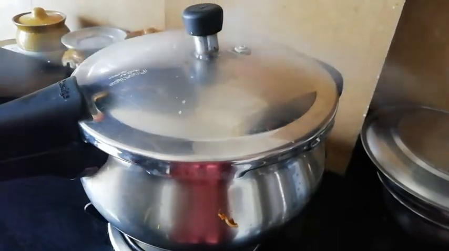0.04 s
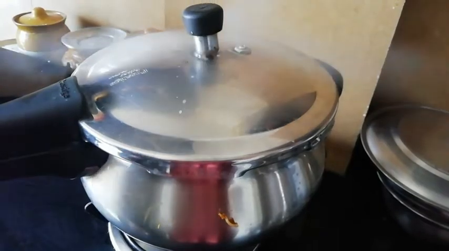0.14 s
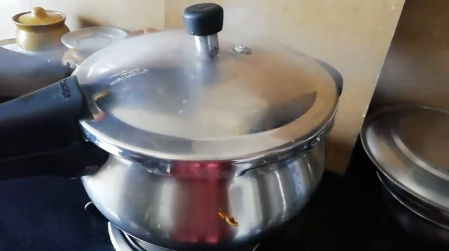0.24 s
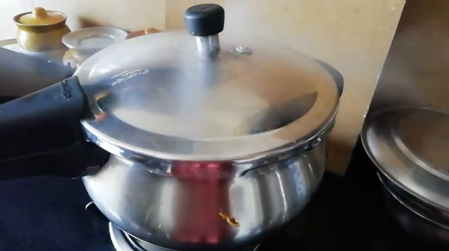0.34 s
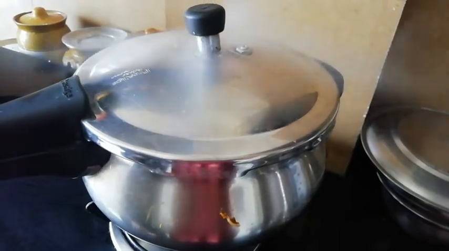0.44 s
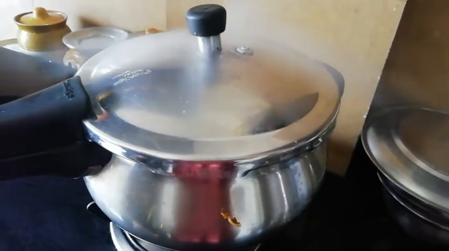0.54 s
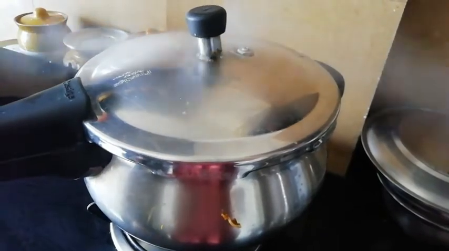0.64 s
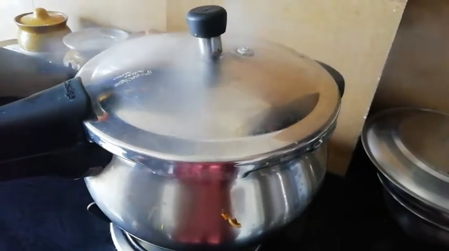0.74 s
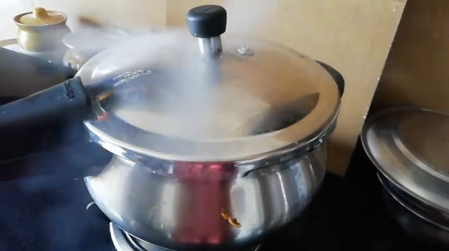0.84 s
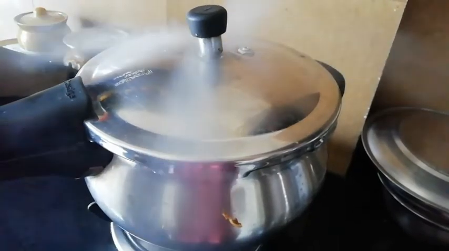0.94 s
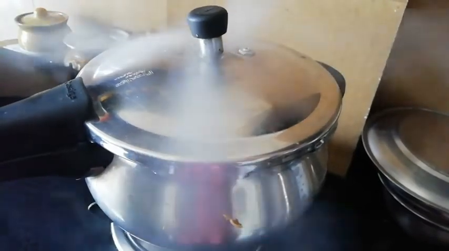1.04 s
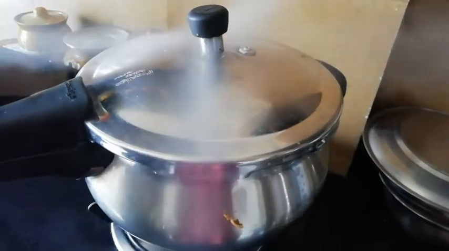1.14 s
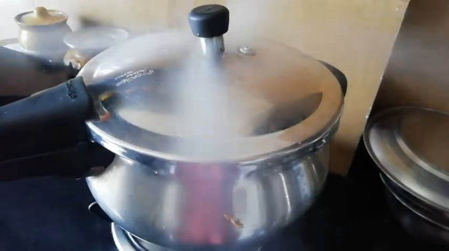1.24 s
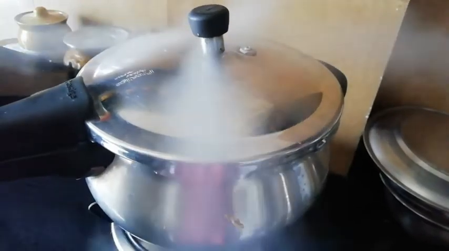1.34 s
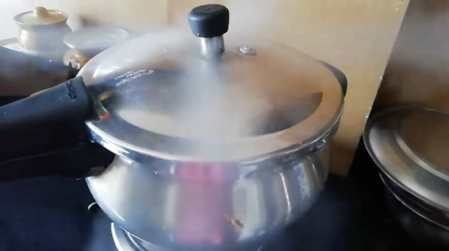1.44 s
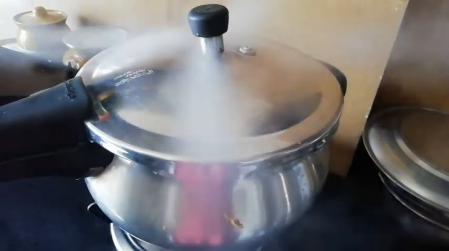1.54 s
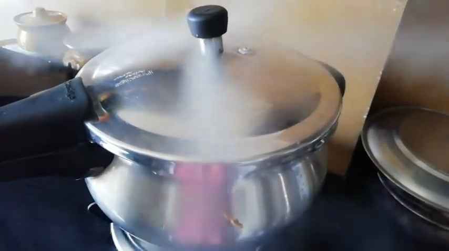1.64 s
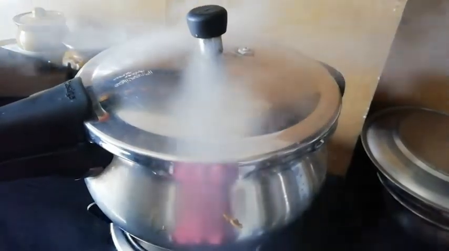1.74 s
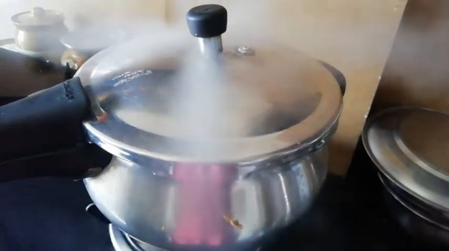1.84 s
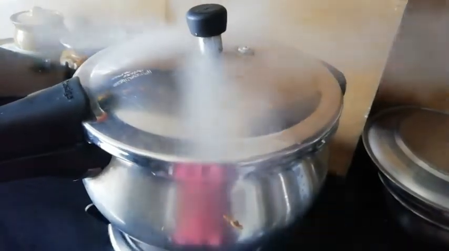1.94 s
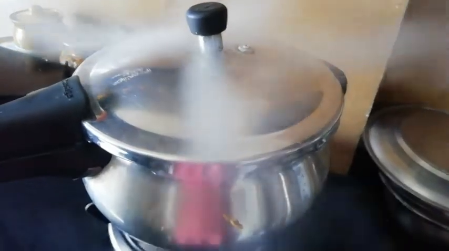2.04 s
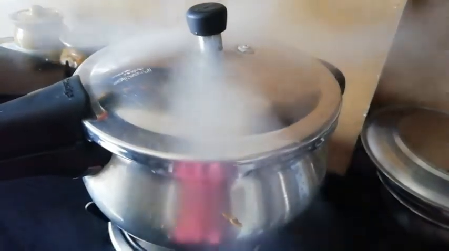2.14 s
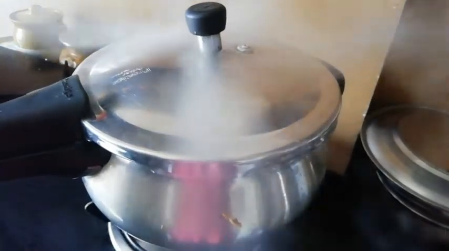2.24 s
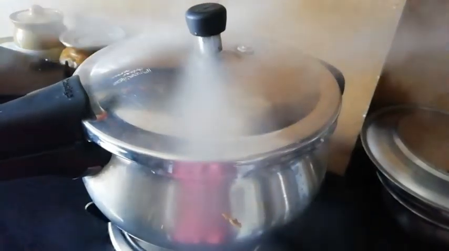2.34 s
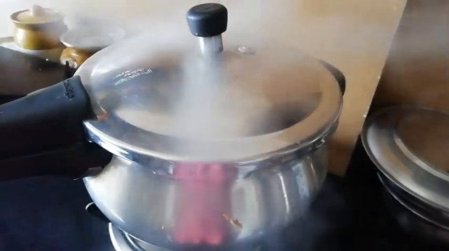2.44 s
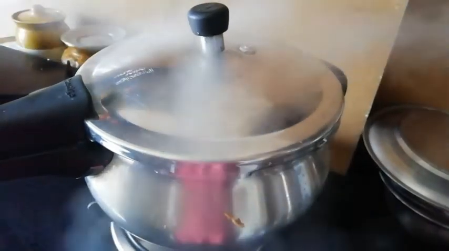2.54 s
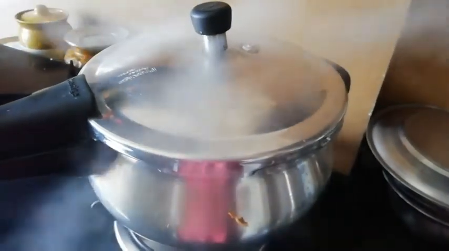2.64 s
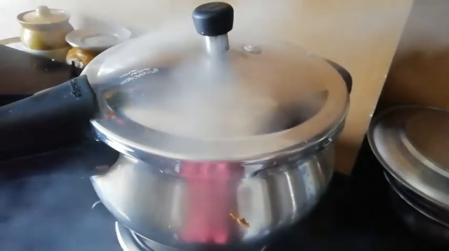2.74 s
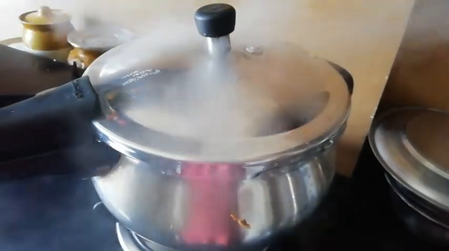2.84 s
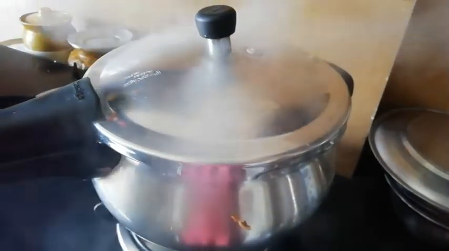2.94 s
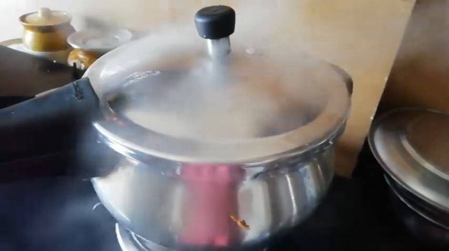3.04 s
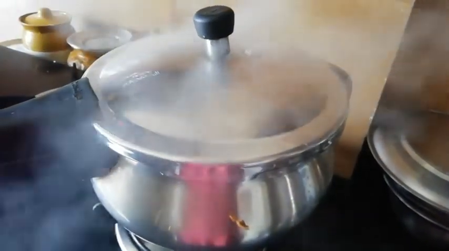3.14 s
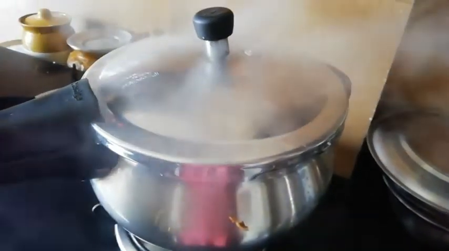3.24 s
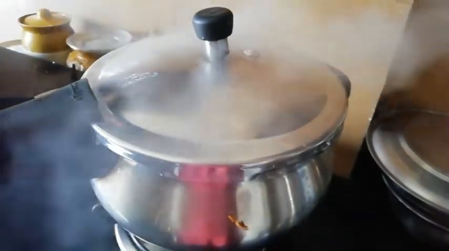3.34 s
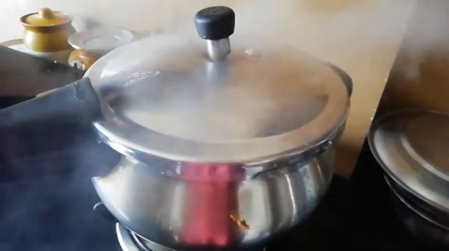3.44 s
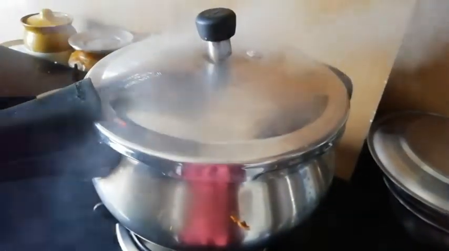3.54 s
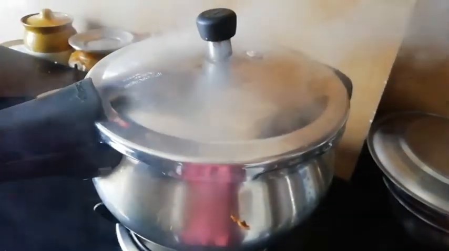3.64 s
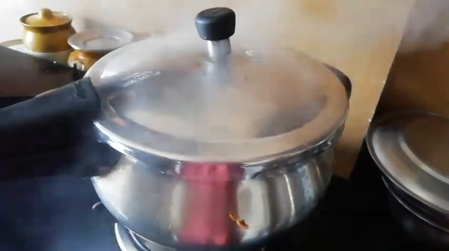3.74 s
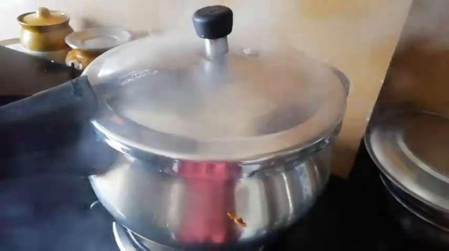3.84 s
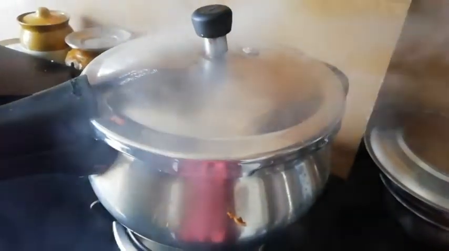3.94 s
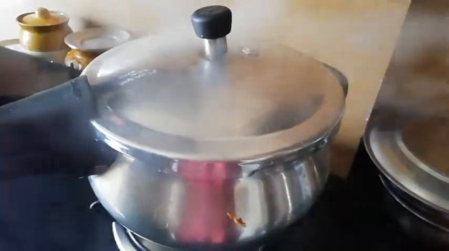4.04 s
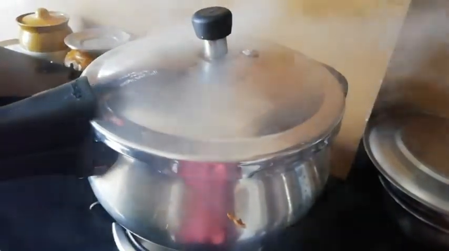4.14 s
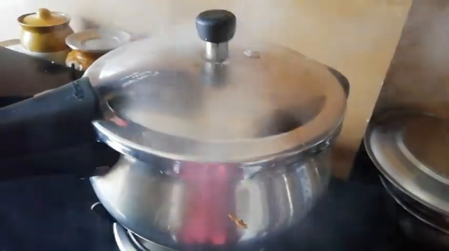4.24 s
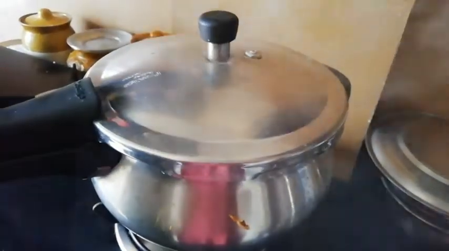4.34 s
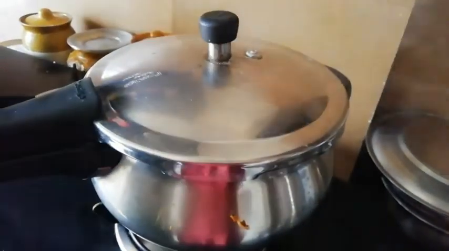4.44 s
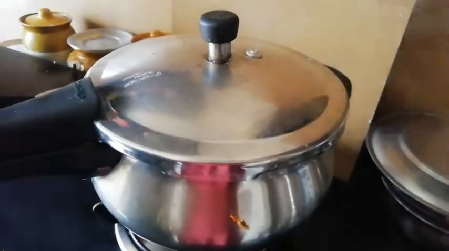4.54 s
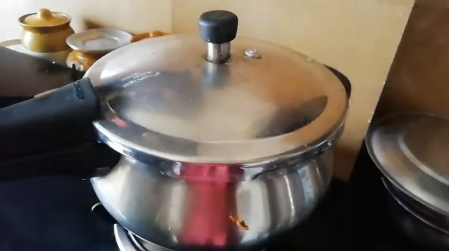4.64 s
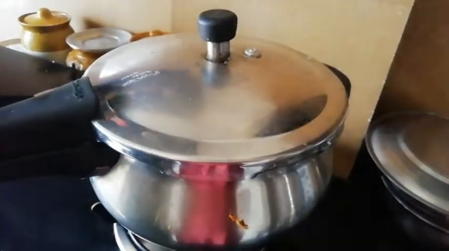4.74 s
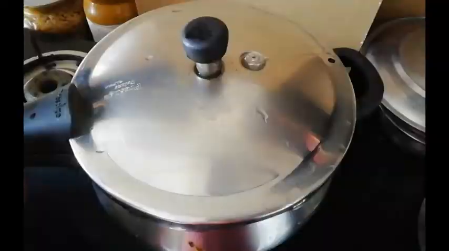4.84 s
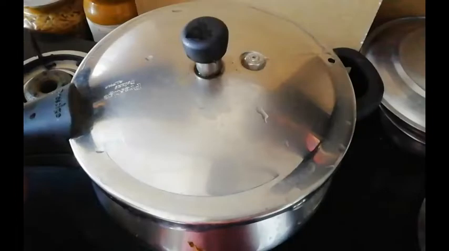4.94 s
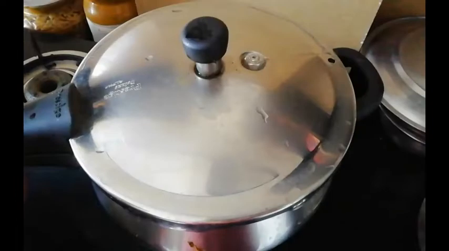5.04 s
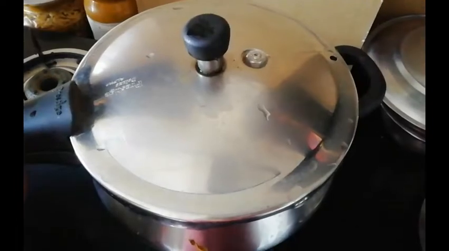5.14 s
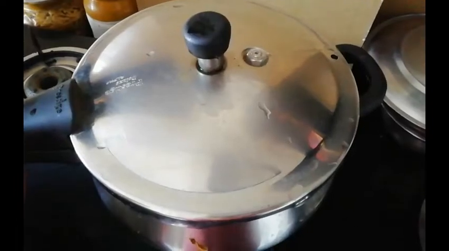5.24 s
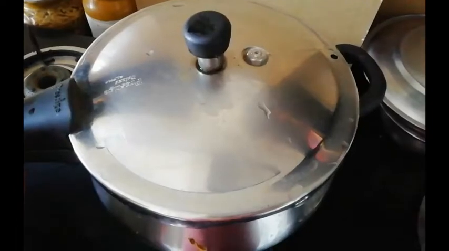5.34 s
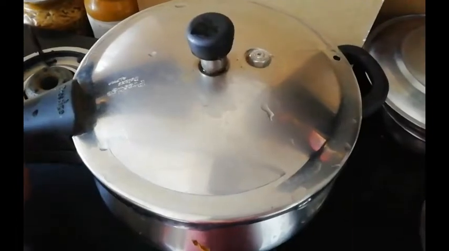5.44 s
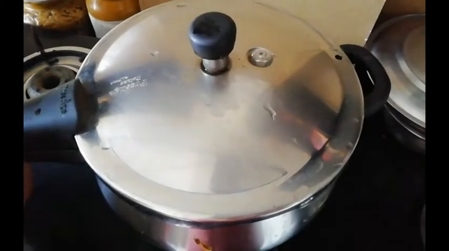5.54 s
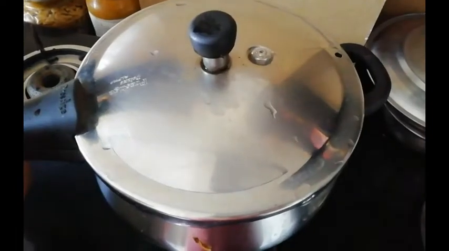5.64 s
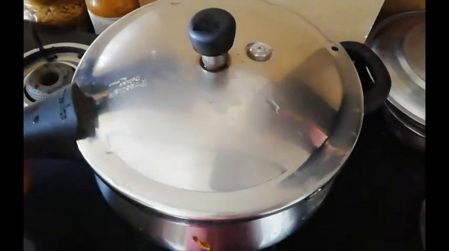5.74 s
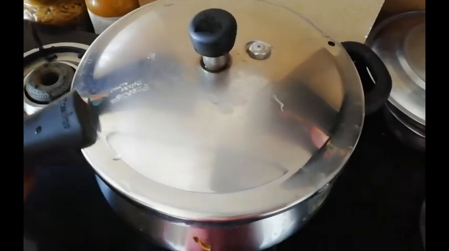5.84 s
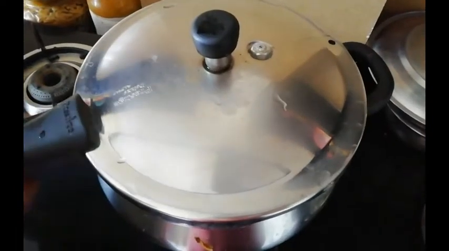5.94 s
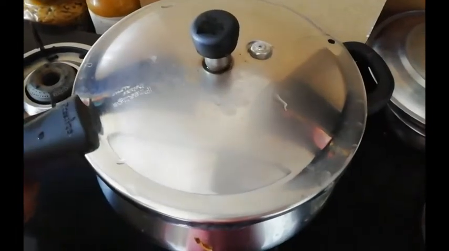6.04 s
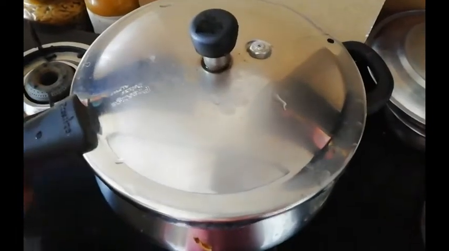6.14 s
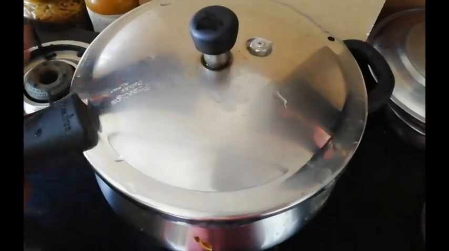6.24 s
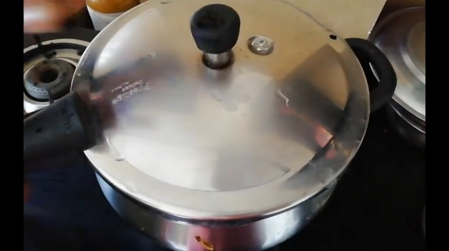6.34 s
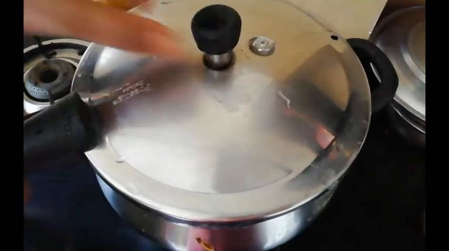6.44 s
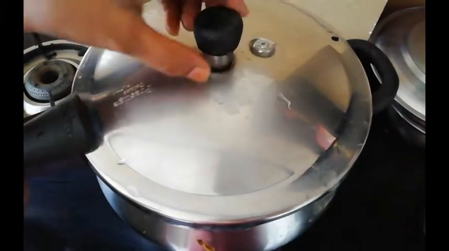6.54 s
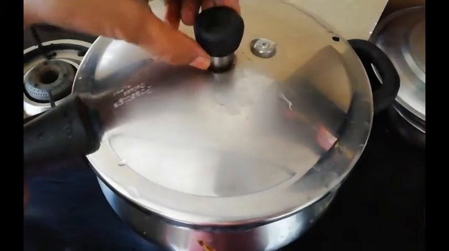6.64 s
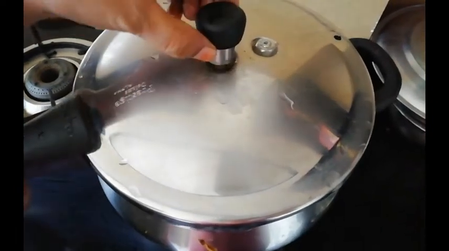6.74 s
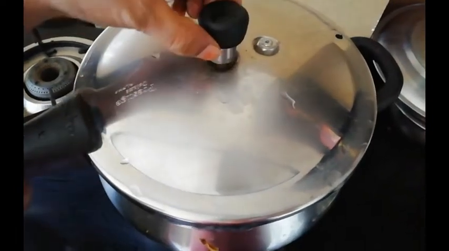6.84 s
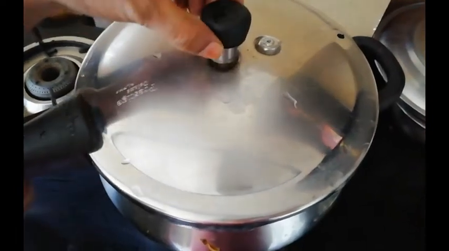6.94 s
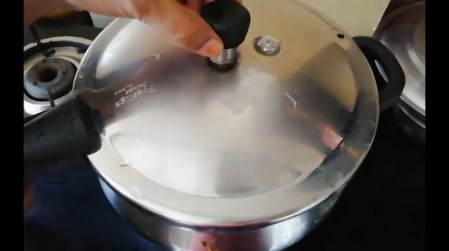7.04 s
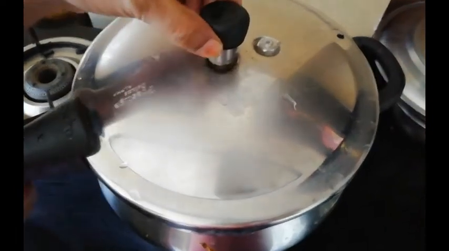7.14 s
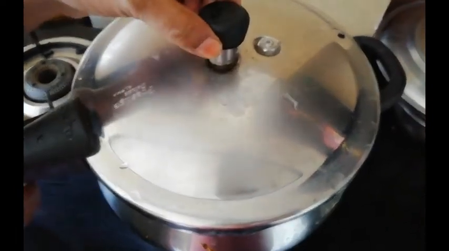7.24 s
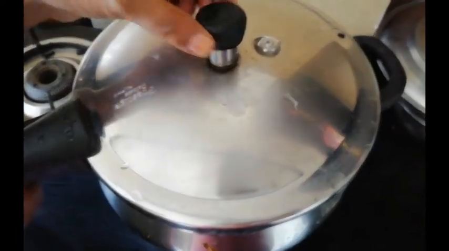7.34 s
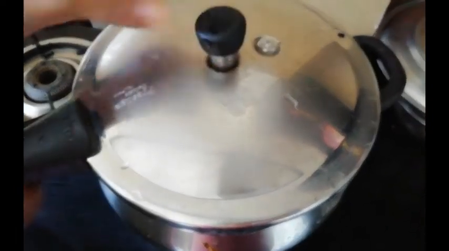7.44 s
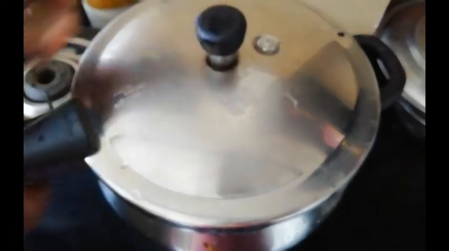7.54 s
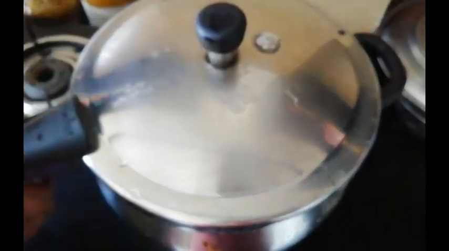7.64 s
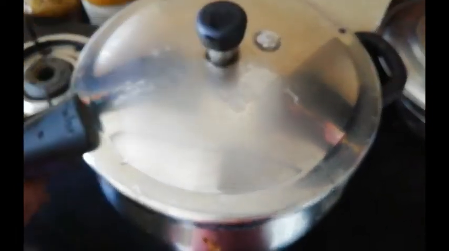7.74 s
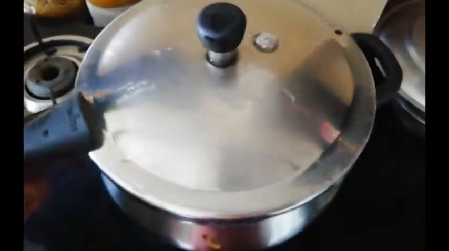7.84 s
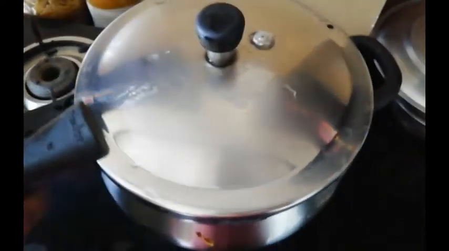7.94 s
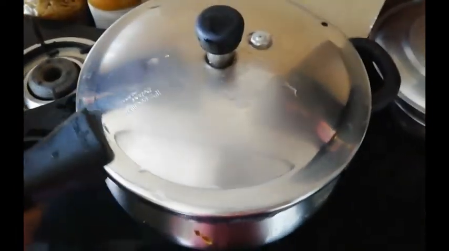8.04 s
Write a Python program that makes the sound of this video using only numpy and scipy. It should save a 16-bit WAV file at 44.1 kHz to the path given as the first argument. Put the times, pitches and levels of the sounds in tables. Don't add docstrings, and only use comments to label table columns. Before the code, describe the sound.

Close handheld stereo capture of a stove-top cooker: loud continuous turbulent hiss with low thumps of air on the microphone, fading quickly into quiet room tone. After a short dead gap, a lumpy low engine idle is heard outside with small handling ticks. A hard metal knock releases a brief fizzing puff that drains away, then a rapid clattering run of metal contacts, and the idling continues.

```python
import sys
import numpy as np
from scipy import signal
from scipy.fft import rfft, irfft, next_fast_len
from scipy.io import wavfile
from scipy.ndimage import uniform_filter1d

SR = 44100
rng = np.random.default_rng(int(sys.argv[2]) if len(sys.argv) > 2 else 0)


def waveform_to_disk(signal):
    frames = np.transpose(np.atleast_2d(signal))
    scaled = np.clip(frames, -1, 1) * 32767
    samples = np.round(scaled).astype(np.int16)
    wavfile.write(sys.argv[1], SR, samples)


def how_loud(loudness_db):
    steps = np.asarray(loudness_db, float) / 20
    return 10 ** steps


N = 357070

# [start t/s, end t/s]
SHOTS_S = [
    (0, 4.7222),
    (5.0593, 8.2),
]
# [f/Hz, level/dB per Hz]
ROOM_COLOUR = [
    [(40, 17), (150, 7), (415, -1), (527, 2.5), (670, 7), (2580, 0), (5980, -4.5), (7830, 2),
     (15600, -12.5)],
    [(25, -15), (60, 12), (125, 9), (196, -1), (300, 6), (527, 6.5), (612, 1.5), (755, 5.5), (1500, 0.5),
     (1970, 0), (7830, -3.5), (9950, -8), (15600, -21.5)],
]
ROOM_LEVEL_DB = [-41.5, -37.5]
# [t/s, turned/cycles]
ENGINE_CYCLES = [(4.98, -6), (5.372, 0), (5.83, 7), (6.09, 11), (7.527, 34), (8.145, 44)]
# [t/s, level/dB, exhaust f/Hz]
ENGINE_BOOM = [
    (5.05, -34, 118),
    (5.4, -32, 117),
    (6.4, -35.5, 118.4),
    (6.62, -49.5, 122),
    (6.95, -43, 114.8),
    (7.15, -36, 110),
    (8.1, -34, 108),
]
# [t/s, peak level/dB, centre f/Hz, t60/s]
TICK_EVENTS = [(4.62, -45, 109.7, .9), (4.648, -44, 3910, 0.033), (4.695, -35.5, 200, .5),
               (5.362, -35, 1400, .08), (5.65, -31, 501, .3), (5.673, -30, 1700, .04),
               (5.695, -29.5, 900, 0.126), (5.745, -34.5, 9520, .03), (5.788, -38, 2000, .05),
               (6.05, -39, 8800, .1), (6.062, -27, 8800, .06), (6.1329, -17.5, 1000, .03),
               (6.137, -37, 2190, 0.22), (7.376, -31, 300, 0.35), (7.85, -38, 1300, .08)]
# [f/Hz, level/dB, t60/s]
LID_MODES = [(605, -12, 0.22), (686, -9.5, 0.21), (772.5, -10, 0.18), (1700, -8, .07), (2600, -3, 0.07),
             (2810, -10.5, .08), (2902, -6.5, .15), (3056, 2.5, .1), (3098, -12, 0.38), (3220, -8.5, 0.099),
             (3380, -8, 0.07), (3725, -9.5, .07), (4690, -6, .045), (5200, -10, 0.035)]
# [t/s, peak level/dB, ring level/dB rel, pot body level/dB rel, crack t60/s]
WEIGHT_KNOCKS = [(4.1923, -23, -1, 7, .04), (4.2231, -20, 1, 1, .06), (6.4878, 3.5, -16, -1, 0.024),
                 (6.6139, 1, -23, 1, .012), (7.322, -20.5, -12, -3.5, .15), (7.332, -19, -9.5, -3, .15),
                 (7.3409, -6, -10, -12, 0.04), (7.3464, 0, -4, -14, 0.028), (7.373, -3.5, -8, -12, .05),
                 (7.3814, -4.5, -11, -12, .05), (7.389, -11, -6.5, -12, .06),
                 (7.3948, -19.5, -7.5, -11, .05), (7.409, -20.5, -5, -5.5, .08),
                 (7.4174, -27.5, -0.5, -3.5, .08)]
# [t/s, signed size/full scale, length/ms]
GUST_STEPS = [(.0747, -.091, 2.4), (.202, .12, 1.8), (.3134, .18, 1.7), (.331, .13, 1.2), (.3726, .13, 1.5),
              (.4104, .11, 1.8), (.4234, .22, 1.0), (.5026, .13, 2.6), (.5517, .12, 1.9),
              (.6381, -.14, 1.5), (.7366, .11, 1.9), (.7469, .18, 3.1), (.7761, .11, 1.7),
              (.7917, .094, 2.4), (.8547, .076, 2.5), (.9971, .081, 1.1), (1.2008, .058, 3.2),
              (1.4343, -.1, 1.6), (1.4973, .058, 2.0), (1.7654, .046, 2.3), (1.8225, .077, 1.2),
              (2.0376, .037, 2.8), (2.2102, .041, 2.0), (2.381, .046, 2.1), (2.8305, .064, 2.4),
              (2.9793, .07, 1.6), (3.0887, .067, 1.3), (3.1593, .12, 1.3), (3.3865, .037, 2.2),
              (4.0536, .083, 2.6)]
# [t/s, level/dB]
BUFFET_LEVEL = [
    (0, -34),
    (.72, -31),
    (.85, -41),
    (1.1, -39),
    (1.5, -44),
    (2.55, -53),
    (2.97, -43),
    (3.3, -47),
    (4.5, -53),
    (4.72, -76),
]
# [t/s, level/dB]
PUFF_FLOW = [
    (6.605, -55),
    (6.618, -11),
    (6.666, -18),
    (6.724, -13),
    (6.772, -18),
    (6.812, -16),
    (6.93, -21),
    (7.0, -27.5),
    (7.31, -45),
]
# [f/Hz, level/dB per Hz]
PUFF_SPECTRUM = [(500, -29), (1100, -0.5), (1500, -10), (2500, -1.5), (4000, -1), (5500, -3), (9950, -1),
                 (12600, -16.5), (15600, -17.5)]
# [f/Hz, level/dB per Hz]
JET_SPECTRUM = [(307, -22.5), (1200, -12.5), (1550, -11), (2820, -5.5), (3380, -4.5), (3930, 1.44),
                (5800, -5), (6740, -7), (7800, -4), (8830, -5.5), (9950, -0.8), (13400, 1), (14700, -1.5),
                (15600, -5)]
# [t/s, level/dB]
PLUME_SWING = [
    (0, 1.5),
    (.12, 0),
    (1.44, -.5),
    (2.36, -1.5),
    (3.25, 0),
    (3.87, -.5),
    (4.15, 1.5),
]
# [f/Hz, level/dB]
RIGHT_PORT_RESPONSE = [
    [(307, 1), (1860, -2.3), (2740, 11.5), (3280, 9.5), (3810, 2), (4050, 4.4), (4700, 9.5), (5980, 4.5),
     (8400, 11.5), (8900, -2), (9950, -1.5), (12300, 4.5), (14300, 0), (15600, -1)],
    [(154, 1), (690, -4.5), (755, -4.5), (1120, -2.5), (2220, 3), (4430, -6.5), (6940, -28), (8830, -30),
     (9950, -26), (15600, -13)],
]
# [below 1.8 kHz/samples, above/samples]
LEFT_LAG_SAMPLES = [
    (-36, 26),
    (-24, -24),
]

T = np.arange(N) / SR
SIZE = next_fast_len(N + SR // 2)
HZ = np.arange(SIZE // 2 + 1) * SR / SIZE + 1e-3


def unit(x):
    return x / np.std(np.atleast_2d(x).mean(axis=0))


def curves(table, off_db=-90):
    s, first, *rest = np.transpose(table)
    return [np.interp(T, s, first, off_db, off_db)] + [np.interp(T, s, c) for c in rest]


def wave(spectrum):
    return irfft(spectrum, SIZE)[..., :N]


def shape(x, gain):
    return wave(rfft(x, SIZE) * gain)


def tilt(table):
    hz, db = np.transpose(table)
    return how_loud(np.interp(np.log(HZ), np.log(hz), db))


def peak(hz, width_hz):
    return 1 / (1 + 1j * (HZ ** 2 - hz ** 2) / (HZ * width_hz))


def between(lo_hz, hi_hz):
    return 1 / np.sqrt((1 + (lo_hz / HZ) ** 24) * (1 + (HZ / hi_hz) ** 24))


def walk(rate_hz):
    k = int(SR / rate_hz)
    held = np.repeat(rng.standard_normal(N // k + 1), k)
    return 1.08 * uniform_filter1d(held, k)[:N]


def dying(stop_s, db_per_s, knee_s):
    return -db_per_s * knee_s * np.logaddexp(0, (T - stop_s) / knee_s)


def noise(likeness):
    mid, side = rfft(rng.standard_normal((2, SIZE)))
    c = np.clip(likeness, 0, .999)
    return mid * np.sqrt(1 + c) + side * np.sqrt(1 - c) * np.array([[1], [-1]])


def add(out, s, x):
    i = int(s * SR)
    out[..., i:i + len(x)] += x[:N - i]


def kitchen(near_db, near_t60, far_db, far_t60):
    t = np.arange(SR // 2) / SR
    tail = how_loud(near_db - 60 * t / near_t60) + how_loud(far_db - 60 * t / far_t60)
    echo = rng.standard_normal((2, len(t))) * tail * np.minimum(t / 0.0036, 1)
    echo[:, 0] = 1
    room = rfft(echo, SIZE)
    return room / np.sqrt(uniform_filter1d(abs(room) ** 2, size=2500))


def room_air(k, ports):
    air = wave(noise(1.1 - HZ / 900) * ports * tilt(ROOM_COLOUR[k])) * how_loud(1.1 * walk(9))
    return how_loud(ROOM_LEVEL_DB[k]) * unit(air)


def engine():
    cycles_per_s, pulse_s = 14.46, 0.014
    db, hz = curves(ENGINE_BOOM, off_db=-41)
    turns = np.interp(T, *np.transpose(ENGINE_CYCLES))
    half = np.floor(2 * turns + .5).astype(int)
    size = how_loud(1.5 * rng.standard_normal(200)[half + 20] - 9 * (half % 2))
    since_s = (turns - half / 2) / cycles_per_s
    partials = [(.52, 0.36), (1, 1), (2.1, 0.21), (2.55, .25)]
    pipe = sum(g * np.cos(2 * np.pi * m * hz * since_s) for m, g in partials)
    boom = size * np.exp(-(since_s / pulse_s) ** 2) * pipe
    return how_loud(db) * unit(boom)


def ticks():
    out, t = np.zeros(N), np.arange(SR // 3) / SR
    for s, db, hz, t60 in TICK_EVENTS:
        grit = rng.standard_normal(len(t))
        grit[0] = 5.7
        b, a = signal.butter(2, [hz / 1.8, min(hz * 1.83, 11500)], "band", fs=SR)
        add(out, s, unit(signal.lfilter(b, a, grit)) * how_loud(db - 60 * t / t60))
    return out


def lid_ring(t, body_db, damping):
    detune, ring = .006, 0
    for (hz, db, t60), c in zip(LID_MODES, rng.standard_normal(len(LID_MODES))):
        level_db = db + 2.5 * c + body_db * (hz < 2000) - 60 * t / (t60 * damping)
        ring = ring + how_loud(level_db) * np.sin(2 * np.pi * hz * (1 + detune * c) * t)
    return ring * np.minimum(t / .0012, 1)


def knocks():
    held_from_s, held_to_s, held_damping, free_damping = 6.4, 7.3, .55, 1.1
    out, t = np.zeros(N), np.arange(SR * 2 // 5) / SR
    dull = signal.butter(1, 5000, fs=SR, output="sos")
    no_lows = signal.butter(4, 1950, "high", fs=SR, output="sos")
    no_air = signal.butter(8, 11000, fs=SR, output="sos")
    band = np.vstack([dull, no_lows, no_air])
    for s, db, ring_db, body_db, t60 in WEIGHT_KNOCKS:
        grit = rng.standard_normal(len(t))
        grit[0] = 2.9
        crack = 0.63 * signal.sosfilt(band, grit * how_loud(-60 * t / max(t60, .005)))
        damping = held_damping if held_from_s < s < held_to_s else free_damping
        ring = lid_ring(t, body_db, damping)
        add(out, s, how_loud(db) * (crack + 0.53 * how_loud(ring_db) * ring))
    return signal.sosfilt(no_air, out)


def gusts():
    ports = [(.00015, -.0006, 1.8), (.00025, .00018, 1.9)]  # (rise/s, delay/s, gain)
    out, t = np.zeros((2, N)), np.arange(1500) / SR
    buffet = how_loud(curves(BUFFET_LEVEL)[0])
    minor = []
    for when, size, length in rng.random((500, 3)):
        s = 4.2 * when
        minor.append((s, 6.7 * (size - .4) * buffet[int(s * SR)], 0.97 + 1.4 * length))
    for s, size, ms in list(GUST_STEPS) + minor:
        for port, (rise_s, delay_s, gain) in enumerate(ports):
            step = np.exp(-t / (ms * 0.0008)) - np.exp(-t / rise_s)
            add(out[port], max(s + delay_s, 0), gain * size * step)
    sweep = np.exp(-2j * np.pi * HZ * np.array([[0], [.0008]]))
    rumble = wave(noise(1 - HZ / 9000) * sweep * peak(70.5, 110))
    out += 0.57 * buffet * unit(rumble)
    return signal.sosfilt(signal.butter(2, 33, "high", fs=SR, output="sos"), out)


def steam(colour, layers, likeness, slow_db, quick_db, path):
    gas = noise(likeness) * tilt(colour)
    sway, out = slow_db * walk(6), 0
    for gain, db in layers:
        heard_rms = np.sqrt(2 * np.sum(abs((gas * gain * path).mean(axis=0)) ** 2)) / SIZE
        sputter = quick_db * (walk(40) + walk(300))
        out = out + wave(gas * gain) * how_loud(db + sway + sputter) / heard_rms
    return out


def puff(path):
    def swell(s):
        return 2500 * np.minimum(T - s, 0)

    def resonance(start_s, db, drift_db_per_s, stop_s, fall_db_per_s):
        steady = db + drift_db_per_s * (T - start_s)
        return swell(start_s) + steady + dying(stop_s, fall_db_per_s, .008)

    core = curves(PUFF_FLOW)[0] - 1.5
    gap = resonance(6.62, -16, 0, 6.645, 1100)
    pipe = resonance(6.68, -40, 20, 6.94, 115)
    layers = [(between(3690, 20000), core),
              (between(20, 4000), core - 14 + swell(6.622)),
              (peak(5400, 1100) ** 2, gap),
              (peak(4000, 400) ** 2, pipe)]
    return steam(PUFF_SPECTRUM, layers, .8, slow_db=0, quick_db=1.2, path=path)


def jet(path):
    swing = np.interp(T, *np.transpose(PLUME_SWING))

    def part(db, drift_db_per_s, swing_share, shut_s, fall_db_per_s):
        return db + drift_db_per_s * T + swing_share * swing + dying(shut_s, fall_db_per_s, .025)

    layers = [(between(6490, 9400), part(-16, 0, 1, 4.19, 150)),
              (between(20, 5840), part(-21.3, -.35, -.1, 4.13, 150)),
              (between(9920, 18000), part(-25, .9, .1, 4.13, 180))]
    likeness = np.where(HZ < 1500, .95, .6)
    return steam(JET_SPECTRUM, layers, likeness, slow_db=0.58, quick_db=.7, path=path)


def phone_ports(k):
    lag = np.where(HZ < 1800, *LEFT_LAG_SAMPLES[k])
    left = how_loud(14 * abs(peak(8750, 1800)) ** 2) * np.exp(-2j * np.pi * HZ * lag / SR)
    return np.array([left, tilt(RIGHT_PORT_RESPONSE[k])])


def shot(k, vent, hits):
    ports = phone_ports(k)
    plume = ports * kitchen(near_db=-38, near_t60=.12, far_db=-46, far_t60=.4)
    struck = ports * kitchen(near_db=-21.5, near_t60=0.035, far_db=-36, far_t60=0.32)
    near = shape(vent(plume), plume) + shape(hits, struck)
    loud_db = 10 * np.log10(signal.lfilter([1e-4], [1, -.9999], near[0] ** 2) + 1e-9)
    duck = how_loud(-.35 * np.maximum(loud_db + 22, 0))
    return near + room_air(k, ports) * duck


def turning(x):
    wander_samples = 7
    low = signal.sosfiltfilt(signal.butter(2, 1200, fs=SR, output="sos"), x[0])
    i = np.arange(N)
    slid = np.interp(i + wander_samples * walk(3), i, low)
    return np.array([x[0] - low + slid, x[1]])


def scene():
    hits = knocks() + ticks()
    first = turning(shot(0, jet, hits)) + gusts()
    second = shot(1, puff, hits) + engine()
    since_s = np.maximum(T - SHOTS_S[1][0], 0)
    second = second - .1 * np.exp(-(since_s / .125) ** 1.3)
    return sum(x * ((T >= a) & (T < b)) for x, (a, b) in zip((first, second), SHOTS_S))


def top_cut(x):
    return signal.sosfilt(signal.butter(12, 15740, fs=SR, output="sos"), x)


def record(dry):
    mix = np.clip(dry, -1, 1)
    return top_cut(mix)


dry = scene()
out = record(dry)
waveform_to_disk(out)
```